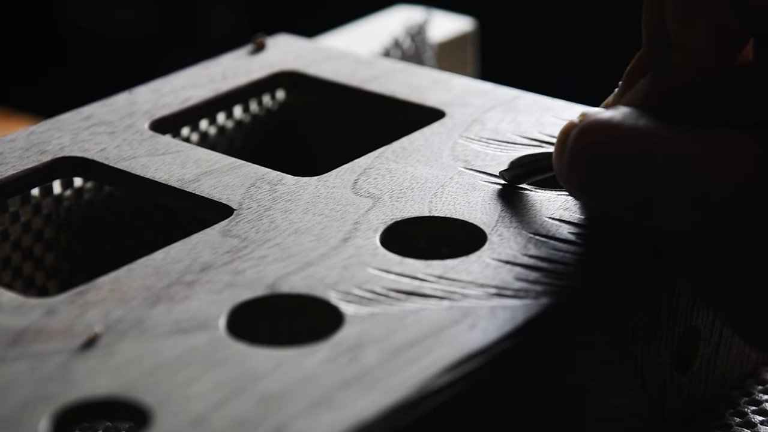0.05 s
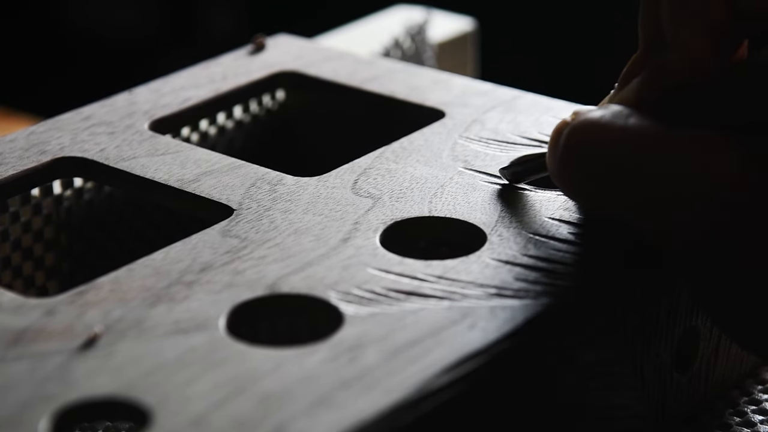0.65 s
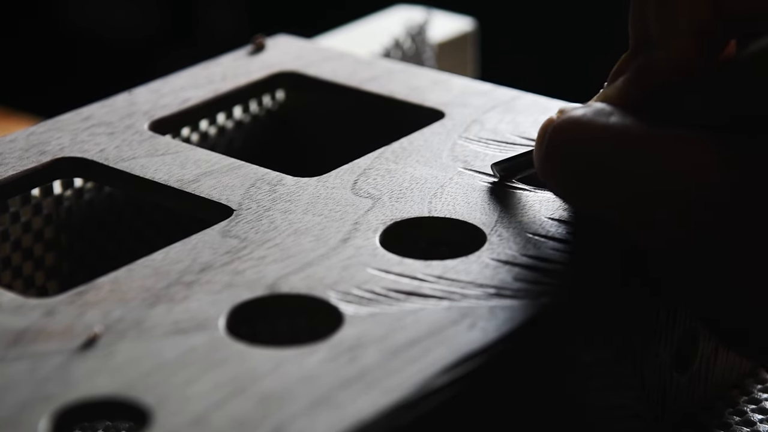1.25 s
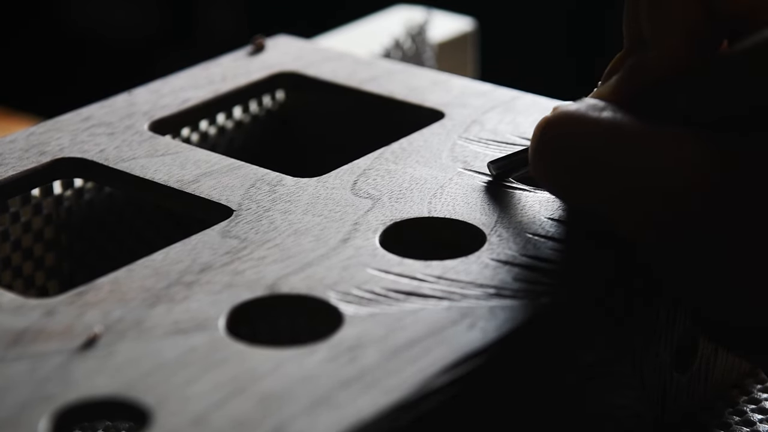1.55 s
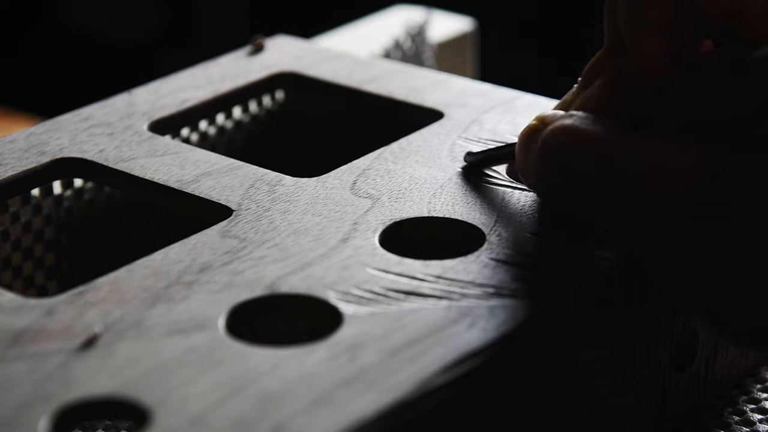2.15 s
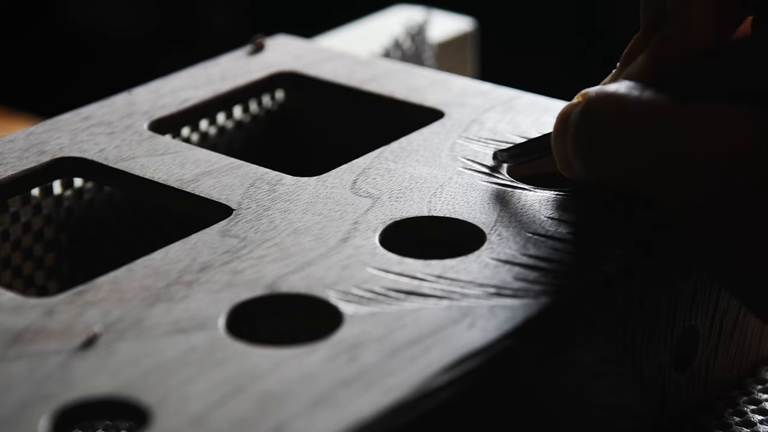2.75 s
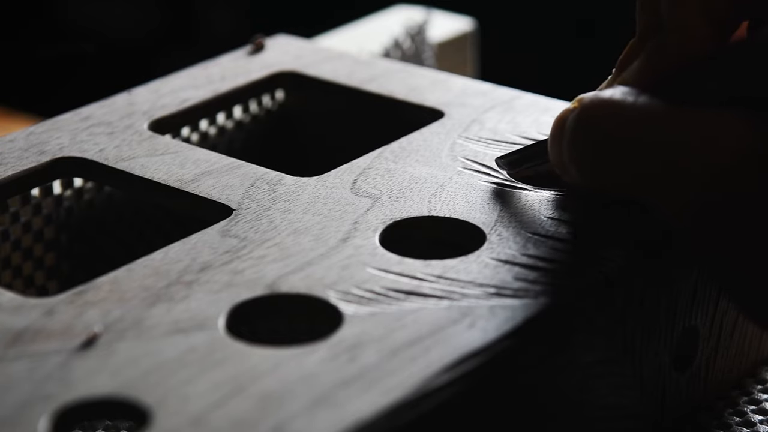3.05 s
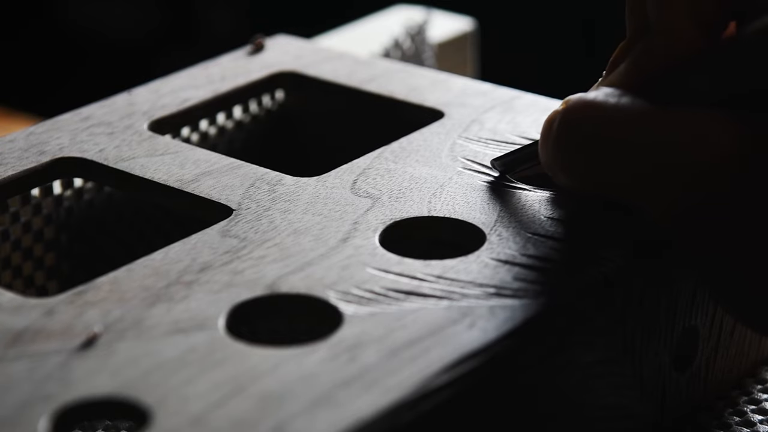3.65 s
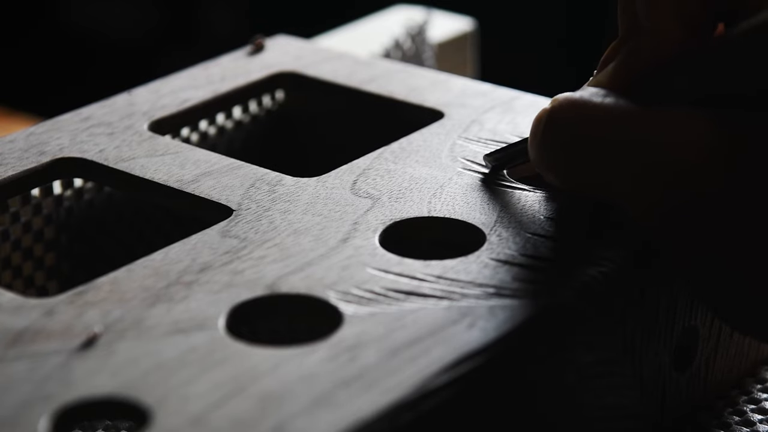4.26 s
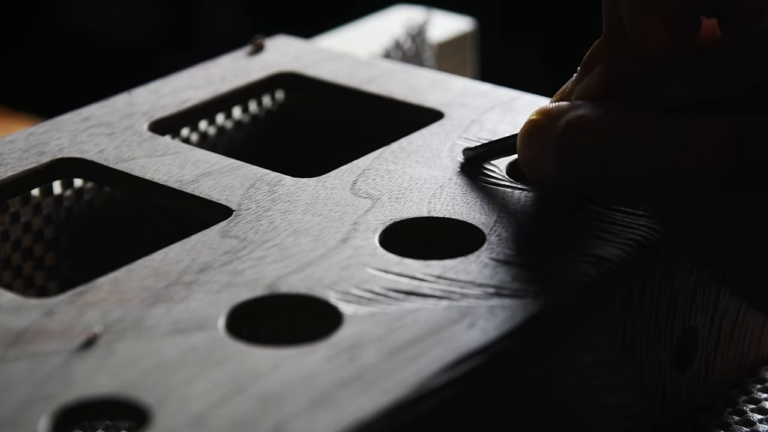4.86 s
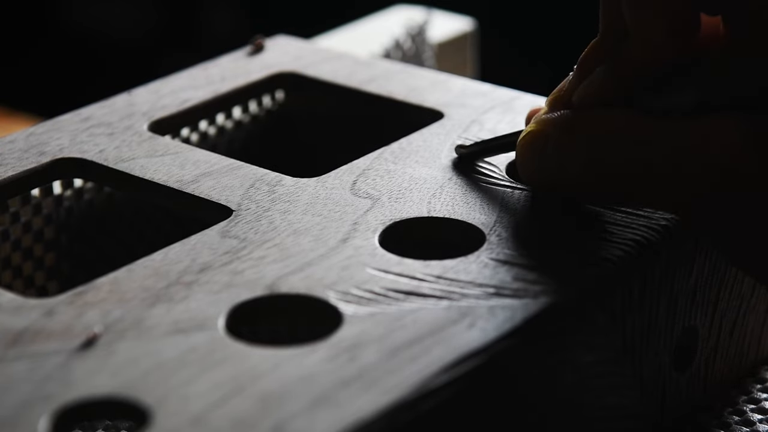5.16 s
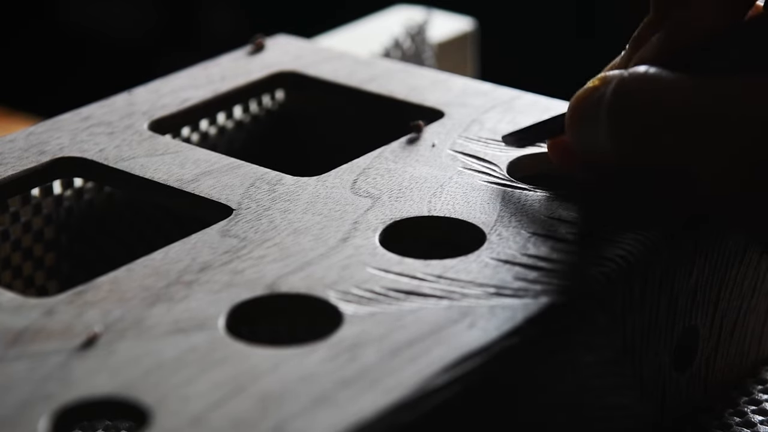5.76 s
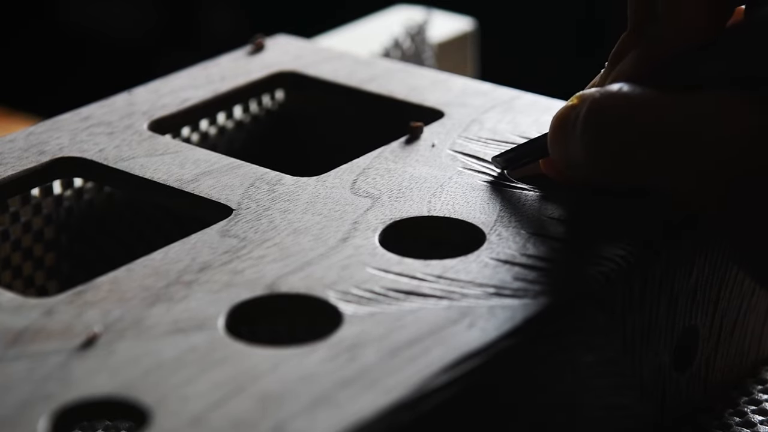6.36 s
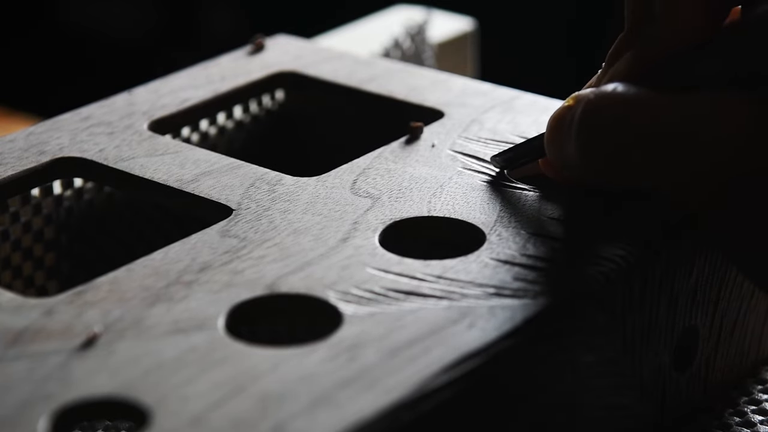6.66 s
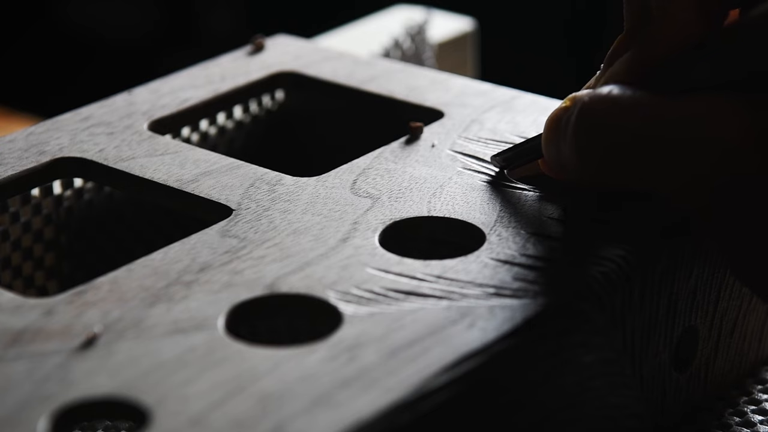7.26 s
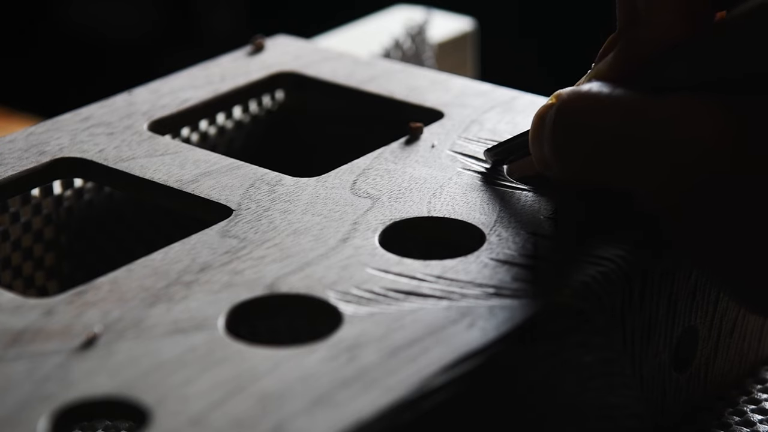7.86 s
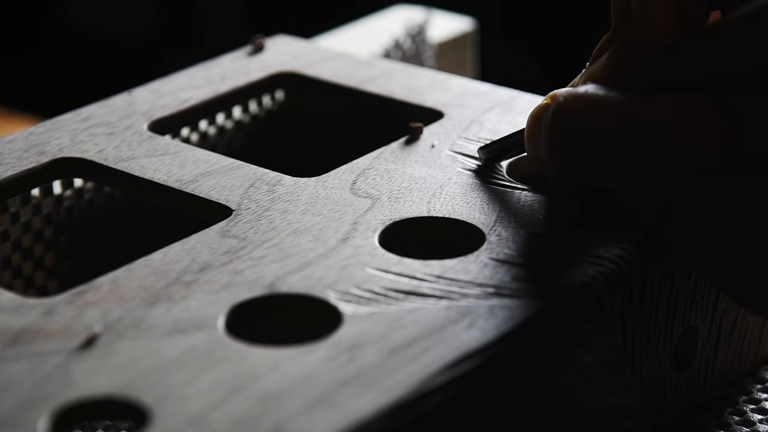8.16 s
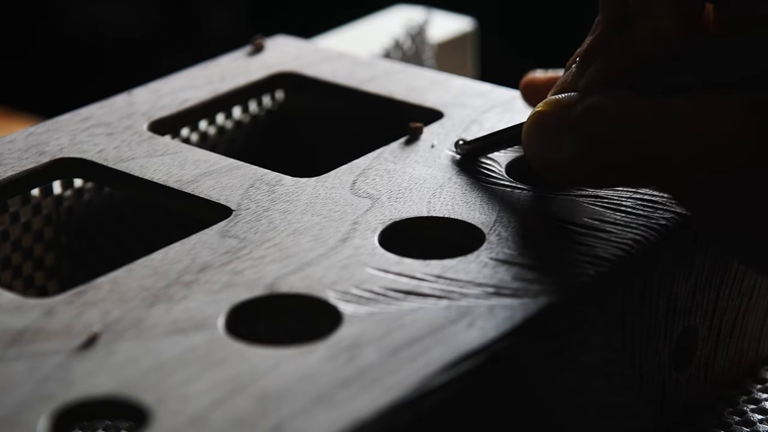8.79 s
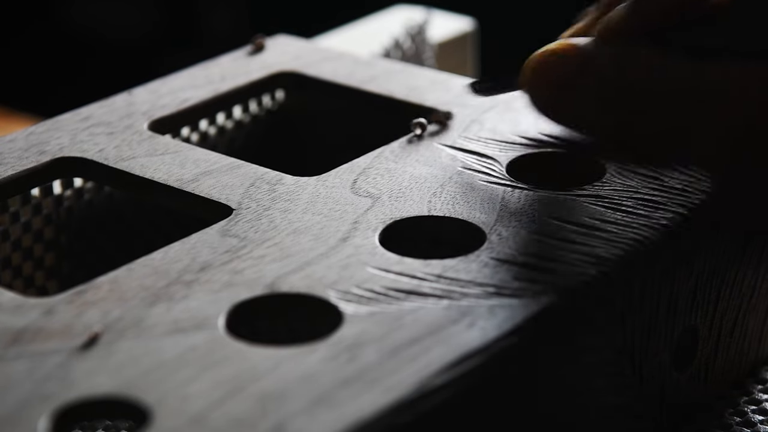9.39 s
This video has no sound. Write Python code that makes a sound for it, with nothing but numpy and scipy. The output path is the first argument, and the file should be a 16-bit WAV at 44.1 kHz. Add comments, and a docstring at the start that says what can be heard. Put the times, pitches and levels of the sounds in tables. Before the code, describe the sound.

Close to a hardwood board, a hand gouge creeps, sticks and jerks forward, making small woody scratches and crackles. The cut builds to a quick, crisp tear as the chip comes away, followed by a pause with soft, hollow bumps of the hand. This happens three times, each ending a little louder. The room is quiet, with a brief ring and a faint background hum and hiss.

```python
"""A quiet room, close to a hardwood board through which a small gouge is pushed in three slow strokes.
The edge moves by stick-slip friction: it creeps, sticks and jerks forward, and each slip fractures fibres
that excite the modes of board and blade. The slips come harder and closer together until one last tear
frees the chip. The hand resettles with soft bumps; the room rings briefly over a faint hum and hiss."""
import sys
import numpy as np
from scipy import signal
from scipy.fft import rfft, irfft, next_fast_len
from scipy.io import wavfile
from scipy.ndimage import uniform_filter1d

SR = 44100
rng = np.random.default_rng(int(sys.argv[2]) if len(sys.argv) > 2 else 0)


def unload_audio(sound):
    """Save the sound as a 16-bit wav file, at the path given as the first command line argument."""
    columns = np.transpose(np.atleast_2d(sound))
    # keep every value between -1 and 1, then stretch to whole-number steps
    steps = np.round(np.clip(columns, -1, 1) * 32767)
    wavfile.write(sys.argv[1], SR, steps.astype(np.int16))


N = 424683
RING = 4096  # samples in a resonator's impulse response
FREQS = np.arange(RING // 2 + 1) * SR / RING
LEAD_S, SLIP_SAMPLES = 0.02, 5292  # lead-in and total span of one slip

# strokes: bite t/s, first creep level/dB, last creep level/dB, exponent of the build-up, judder/dB
STROKE_PLAN = [(0.57, -68.5, -46, 4.2, 2.3), (3.5, -71.5, -59.5, 1.1, 3.4), (6.98, -69.5, -67, 1.7, 3.8)]
# the tear that ends each stroke: t/s, duration/s, level/dB, treble/dB
FINAL_TEARS = [(2.21, 0.11, -41.5, 2.5), (5.263, 0.061, -35.5, 0.5), (9.093, 0.087, -30.5, 1.5)]


def undb(db):
    """Amplitude ratio of a level in decibels."""
    return 10 ** (np.asarray(db) / 20)


def level(x, db):
    """Scale a signal to an rms level."""
    return x * undb(db) / np.sqrt(np.mean(x ** 2))


def peak(x, db):
    """Scale a signal to a peak level."""
    return x * undb(db) / np.abs(x).max()


def add(out, start, x):
    """Superpose a sound from a start time in seconds."""
    i = int(start * SR)
    out[i:i + len(x)] += x[:len(out) - i]


def walk(rate):
    """Low-pass random modulation with a spread near 1."""
    hold = int(SR / rate)
    steps = np.repeat(rng.standard_normal(N // hold + 1), hold)
    return 1.337 * uniform_filter1d(uniform_filter1d(steps, hold), hold)[:N]


def resonance(hz, width):
    """Power response of one steep-sided mode: a cubed Lorentzian."""
    return (1 + ((FREQS - hz) / width) ** 2) ** -3


def ring(power):
    """Minimum-phase impulse response of a power spectrum, spread in time by dispersion in the wood."""
    cepstrum = irfft(np.log(power + 1e-9) / 2)
    cepstrum[1:RING // 2] *= 2
    cepstrum[RING // 2 + 1:] = 0
    delay_s = .0002 + .0006 * np.interp(FREQS, np.linspace(0, SR / 2, 20), rng.random(20))
    response = irfft(np.exp(rfft(cepstrum) - 2j * np.pi * np.cumsum(delay_s) * SR / RING))
    return response * np.hanning(2 * RING)[RING:]


def split(x, hz=2400):
    """Crossover filter: the woody body and the treble of a sound."""
    return [signal.sosfilt(signal.butter(4, hz, kind, fs=SR, output="sos"), x)
            for kind in ("low", "high")]


def background(air_db=-68.5, sway_db=1.26, waver_db=4, drift_hz=2.33, side_db=-21):
    """Room air is coloured noise, nearly alike at both ears; a hum wavers in frequency and amplitude."""
    # spectrum of the still air: f/Hz, relative level/dB
    air_spectrum = [(40, -14.5), (58, -3.5), (90, -5.5), (125, -2.5), (270, -1.5), (500, -3.5),
                    (1000, -7.5), (2000, -18.5), (4000, -25), (7000, -35.5), (16000, -82)]
    # hum: f/Hz, level/dB
    hum_tones = [(242.2, -77)]
    hz, db = np.transpose(air_spectrum)
    size = next_fast_len(N, True)
    log_hz = np.log(np.arange(size // 2 + 1) * SR / size + 1)
    colour = undb(np.interp(log_hz, np.log(hz), db))
    noise = irfft(rfft(rng.standard_normal((2, size))) * colour, size)
    mid, side = level(noise[:, :N], air_db)
    out = mid * undb(sway_db * walk(4.14)) + undb(side_db) * np.array([side, -side])
    for hum_hz, hum_db in hum_tones:
        phase = 2 * np.pi * np.cumsum(hum_hz + drift_hz * walk(14)) / SR
        out += level(np.sin(phase) * undb(waver_db * walk(7)), hum_db)
    return out


def handling(bump_hz=254, bump_width_hz=64, bump_s=0.076):
    """Soft contacts each excite one low, damped mode as the grip shifts and the board rocks."""
    # dull knocks of hand, tool and board: t/s, peak level/dB, f/Hz, width/Hz, duration/s
    knocks = [(2.155, -58, 110, 45, 0.187), (5.237, -48, 94, 60, 0.14)]
    # hollow bumps as the hand resettles: t/s, peak level/dB
    bumps = [(0.09, -60.5), (2.485, -59), (3.02, -58.5), (5.81, -58), (6.71, -59)]
    contacts = knocks + [(start, db, bump_hz, bump_width_hz, bump_s) for start, db in bumps]
    out = np.zeros(N)
    for start, db, hz, width, length in contacts:
        n = int(length * SR)
        force = rng.standard_normal(n) * np.hanning(n)
        add(out, start, peak(signal.fftconvolve(force, ring(resonance(hz, width))), db))
    return out


def fibres(n, rate, spread_db=3.0, rub_db=-11.5):
    """Acoustic emission: tiny fractures form a random impulse train over the friction of the bevel."""
    size = undb(spread_db * np.minimum(rng.exponential(size=n), 4)) * rng.choice([-1, 1], n)
    clicks = size * (rng.random(n) < rate / SR)
    return clicks + undb(rub_db) * rng.standard_normal(n)


def board(scatter_db, force_db, damping_per_db=0.15, detune=0.019):
    """Modal power response of board and blade; place and depth of the cut shift and weight the modes."""
    # modes of board and blade: f/Hz, width/Hz, relative level/dB
    modes = [(104, 57, -22), (305, 88, -20.5), (470, 50, -12.5), (593, 87, -6.5), (700.3, 78, 3.5),
             (880, 109, -1), (1100, 99, -1.5), (1264.5, 63, -2.5), (1413, 63, -9.5), (1593, 187, -5.5),
             (1803, 79, -7), (2093, 440, -19), (2918, 216, -11), (3250, 85, -18.5), (3630, 213, -14),
             (4098, 374, -15), (4710, 130, -16.5), (5242, 220, -12), (5710, 125, -16), (6515, 320, -11),
             (7440, 520, -12.5), (8060, 270, -12.5), (8420, 270, -20.5), (9100, 300, -20.5),
             (9790, 380, -19.5), (10410, 460, -22.5), (12150, 600, -24), (14000, 5600, -35.5)]
    # growth of the modes with the depth of cut: f/Hz, slope/(dB per dB of force)
    depth_slopes = [(90, 0.4), (700, 0.27), (1100, 0.05), (1800, 0.455), (2900, 0.2057), (12000, 0.5)]
    hz, width, db = np.transpose(modes)
    width = width * undb(damping_per_db * force_db * (hz > 2400))  # pressing damps the blade
    hz = hz * (1 + detune * rng.uniform(-1.07, 1, len(hz)))
    slope_hz, slope = np.transpose(depth_slopes)
    db = db + force_db * np.interp(np.log(hz), np.log(slope_hz), slope)
    db = db + scatter_db * rng.uniform(-1.18, 1, len(hz))
    return sum(gain ** 2 * resonance(f, w) for gain, f, w in zip(undb(db), hz, width))


def creep(treble_db=-3, flutter_db=4.0, bite_s=0.053):
    """Microfracture under a rising load: a fine crackle grows as the hand leans in, until the chip parts."""
    grain = fibres(N, rate=1200) * undb(flutter_db * walk(70))
    light_touch = ring(board(scatter_db=0, force_db=-22))
    body, treble = split(signal.fftconvolve(grain, light_touch)[:N])
    crackle = body + undb(treble_db) * treble
    t, push = np.arange(N) / SR, 0
    for (bite, first_db, last_db, exponent, _), (tear_s, length, _, _) in zip(STROKE_PLAN, FINAL_TEARS):
        effort = np.clip((t - bite) / (tear_s - bite), 0, 1) ** exponent
        contact = np.clip((t - bite) / bite_s, 0, 1) * (t < tear_s + length)
        push = push + contact * undb(first_db + (last_db - first_db) * effort)
    return push * level(crackle, 0)


def linger(x):
    """Free vibration: lightly damped modes of the work decay exponentially after each excitation."""
    # lightly damped modes: f/Hz, T60/s, gain at resonance/dB
    lasting_modes = [(88.3, 0.55, 0.5), (1310, 0.4, -3), (3540, 0.46, 3), (3780, 0.32, 1.5)]
    t, response = np.arange(SR) / SR, 0
    for hz, t60, db in lasting_modes:
        decay = np.log(1000) / t60
        response = response + undb(db) * 2 * decay / SR * np.exp(-decay * t) * np.cos(2 * np.pi * hz * t)
    return signal.fftconvolve(x, response)[:N]


def room(x, build_s=0.01):
    """Reverberation: diffuse reflections build up quickly, then each band decays at its own rate."""
    # reverberation bands: f/Hz, T60/s, gain/dB
    bands = [(90, 0.34, 1), (272, 0.41, 1), (684, 0.34, -16), (1360, 0.51, -15), (1860, 0.4, -11),
             (4060, 0.45, -11), (7500, 0.42, -24), (13100, 0.3, -11)]
    t = np.arange(SR) / SR
    noise = rfft(rng.standard_normal(SR))
    log_hz, log_centres = np.log(np.arange(SR // 2 + 1) + 1), np.log(np.array(bands)[:, 0])
    tail = 0
    for share, (_, t60, db) in zip(np.eye(len(bands)), bands):
        band = irfft(noise * np.interp(log_hz, log_centres, share))
        fade = np.exp(-np.log(1000) * t / t60) * (1 - np.exp(-(t / build_s) ** 2))
        tail = tail + undb(db) * band * fade / np.linalg.norm(fade)
    return signal.fftconvolve(x, tail)[:N]


def judder_at(time):
    """Depth in dB of the amplitude modulation by the uneven run of the edge in the current stroke."""
    stroke = sum(time > row[0] for row in STROKE_PLAN[1:])
    return STROKE_PLAN[stroke][-1]


def slip(length, db, treble_db, judder_db, arch_db=3, stop=0.32, skirt_db=-19,
         rise_s=0.00018, fall_s=0.0018, skirt_s=0.017, judder_hz=140):
    """One stick-slip cycle: fibres give, tear in a juddering run, and the edge sticks with a thud."""
    length = np.clip(length, .003, .08)
    t = np.arange(SLIP_SAMPLES) / SR - LEAD_S
    beats = np.cumsum(rng.uniform(0.59, 1.472, size=64)) / judder_hz - LEAD_S
    swings = (-1) ** np.arange(len(beats)) * rng.uniform(0, 2.1, len(beats))
    judder = undb(judder_db * np.interp(t, beats, swings))
    onset = (1 + np.tanh((t - rise_s) / (rise_s + 0.096 * length) / 2)) / 2
    release = (1 - np.tanh((t - length) / fall_s / 2)) / 2
    arch = undb(-arch_db * np.minimum((2 * t / length - 1) ** 2, 1))  # positive: fastest halfway
    # a little tearing before and after the run
    skirt = undb(skirt_db) * np.exp(-np.maximum(np.abs(t - length / 2) - length / 2, 0) / skirt_s)
    envelope = onset * release * arch + skirt
    force_db = db + 32.0
    fracture_rate = 5000 * undb(0.5 * force_db)  # a light cut breaks few fibres
    force = envelope * judder * fibres(SLIP_SAMPLES, fracture_rate, rub_db=-12)
    thud = np.exp(-((t - length) / 0.00026) ** 2)
    force = force + stop * np.linalg.norm(force) / np.sqrt(length * SR) * thud
    body, treble = split(signal.fftconvolve(force, ring(board(scatter_db=3.5, force_db=force_db))))
    tilt = undb(treble_db - 9.0)
    wood = body / np.linalg.norm(body) + tilt * treble / np.linalg.norm(treble)
    shaving = undb(-19.5 + 0.3 * force_db) * splinters(envelope)
    return (wood + shaving) * undb(db) * np.sqrt(length * SR / (1 + tilt ** 2))


def splinters(envelope, rate=1100, low_hz=7000, high_hz=15500, width_hz=260, count=9):
    """Brittle fracture of the shaving: random impulses excite a few high modes of each piece."""
    clicks = (rng.random(len(envelope)) < rate / SR) * rng.standard_normal(len(envelope))
    power = sum(resonance(hz, width_hz) / hz ** 2 for hz in rng.uniform(low_hz, high_hz, count))
    sound = signal.fftconvolve(clicks * envelope, ring(power / power.max()))
    return sound / (np.linalg.norm(sound) + 1e-12)


def snap(db, splinter_s=0.0014, splinter=0.8, treble_db=3.5):
    """Impulse excitation: a fibre bundle breaks at once, with a brief trail of splinters."""
    t = np.arange(SR // 100) / SR
    force = splinter * rng.standard_normal(len(t)) * np.exp(-t / splinter_s)
    force[0] += 1
    power = board(scatter_db=2, force_db=2.5) * undb(treble_db * FREQS / 8000) ** 2
    return peak(signal.fftconvolve(force, ring(power)), db)


def rasp(length, db, flutter_db=5.5, places=8):
    """Moving excitation point: fibres tear without a break, and each place weights the modes anew."""
    n = int(length * SR)
    grain = fibres(n, rate=2500) * undb(flutter_db * walk(69.6)[:n]) * signal.windows.tukey(n, .5)
    travel, sound = np.linspace(0, places - 1, n), 0
    for place in range(places):
        nearness = np.sqrt(np.maximum(1 - np.abs(travel - place), 0))
        sound = sound + signal.fftconvolve(grain * nearness, ring(board(scatter_db=4, force_db=-19)))
    return level(sound[:n], db)


def tear(start, length, db, treble_db, spacing_s=0.012, moving_share=0.9):
    """Rapid stick-slip: slip follows slip with hardly a pause as the chip breaks away."""
    out = np.zeros(N)
    count = round(length / spacing_s)
    step = length / count
    slip_db = db - 10 * np.log10(moving_share)
    for k in range(count):
        onset = start + step * (k + (k > 0) * rng.uniform(-.15, .15))
        jerk = slip(step * moving_share, slip_db, treble_db, judder_at(start),
                    arch_db=-0.5, stop=0.17, skirt_db=-20.0)
        add(out, onset - LEAD_S, jerk)
    return out


def carving(snap_db=-3):
    """Superposition of the creep, slips, rasps, snaps and final tear of every stroke."""
    # separate slips of the edge: t/s, duration/s, level/dB, treble/dB
    slips = [ (0.861, 0.031, -59.5, -3), (0.95, 0.073, -61.5, 1.5), (1.059, 0.048, -61.5, 1.5),
             (1.176, 0.027, -64.5, 10), (1.396, 0.02, -56.5, 3), (1.641, 0.026, -48, 2),
             (1.716, 0.044, -57, 11), (1.768, 0.039, -60, 6), (1.855, 0.037, -52.5, 1.5),
             (1.928, 0.04, -45.5, 3.5), (1.992, 0.027, -41.5, 4.5), (2.058, 0.067, -40.5, 3),
             (2.154, 0.038, -41.5, 0), (3.578, 0.042, -67, 4), (3.736, 0.043, -58.5, -0.5),
             (3.899, 0.05, -55.5, 0), (4.047, 0.049, -60, 2), (4.102, 0.032, -54, 4),
             (4.252, 0.033, -45, 0.5), (4.311, 0.028, -50.5, 2), (4.358, 0.038, -47, 0),
             (4.435, 0.029, -50.5, 3.5), (4.512, 0.014, -42, 1.5), (4.566, 0.0038, -47, -5),
             (4.584, 0.044, -43, 1), (4.649, 0.026, -40.5, 5), (4.707, 0.016, -39.5, 4),
             (4.733, 0.0094, -43, 4.5), (4.761, 0.0086, -39, 10), (4.775, 0.005, -40.5, 1),
             (4.815, 0.0055, -41, -1), (4.825, 0.0087, -35, 3), (4.85, 0.007, -41, 5),
             (4.892, 0.016, -42, 5), (4.916, 0.018, -52, 3), (5, 0.007, -41.5, -3), (5.08, 0.008, -37, 3.5),
             (5.12, 0.0068, -33.5, -1.5), (5.186, 0.016, -36, 1.5), (5.203, 0.016, -37.5, 4),
             (5.226, 0.0076, -34, 2), (5.238, 0.0048, -36, 9), (5.25, 0.0079, -34.5, 2.5),
             (7.112, 0.017, -62, 3), (7.228, 0.018, -56, 0.5), (7.355, 0.035, -58, 0),
             (7.422, 0.06, -58, 1.5), (7.519, 0.014, -60, 8), (7.621, 0.023, -51.5, 1.5),
             (7.676, 0.026, -49.5, 2.5), (7.788, 0.058, -55, 3), (7.922, 0.043, -53.5, 5),
             (8.017, 0.037, -48.5, 2.5), (8.123, 0.034, -52, 0.5), (8.205, 0.019, -48, 9.5),
             (8.23, 0.044, -46, 1.5), (8.353, 0.038, -39, 1), (8.393, 0.035, -44, 1.5),
             (8.426, 0.0078, -39.5, 0), (8.493, 0.0094, -38, 1.5), (8.545, 0.0085, -37.5, 2),
             (8.557, 0.0083, -39.5, 3.5), (8.642, 0.012, -33.5, 1.5), (8.685, 0.0089, -37, 1),
             (8.773, 0.0093, -32.5, 3), (8.873, 0.0065, -34, 1.5), (8.923, 0.013, -44.5, 2.5),
             (8.947, 0.0048, -31.5, -5), (8.956, 0.01, -34, 2.5), (8.977, 0.0026, -39.5, 6),
             (9.002, 0.0062, -28, 2), (9.033, 0.003, -35.5, 5), (9.04, 0.0068, -31, -0.5),
             (9.051, 0.0042, -29.5, 2), (9.059, 0.0067, -33.5, 0), (9.076, 0.0084, -30.5, 0.5)]
    # rasping between slips: t/s, duration/s, level/dB
    rasps = [(1.892, 0.35, -54.5), (4.201, 0.72, -53.5), (8.299, .6, -65.5)]
    # fibre bundles that break: t/s, peak level/dB before snap_db is added
    snaps = [(1.398, -38), (2.097, -32), (2.136, -23.5), (4.103, -33), (4.258, -39), (4.316, -38),
             (4.567, -36), (5.287, -26), (7.830, -32.5), (8.213, -30), (8.353, -25.5), (8.642, -16.5),
             (8.950, -21), (9.097, -18), (9.144, -17.5)]
    out = creep()
    for start, length, db, treble_db in slips:
        add(out, start - LEAD_S, slip(length, db, treble_db, judder_at(start)))
    for start, length, db in rasps:
        add(out, start, rasp(length, db))
    for start, db in snaps:
        add(out, start, snap(db + snap_db))
    return out + sum(tear(*row) for row in FINAL_TEARS)


def touch(start_s=3.23, peak_db=-49.5, decay_s=0.002):
    """Light impact: the edge is set down, and a short force pulse rings the wood with a tick."""
    # modes of the tick: f/Hz, width/Hz, relative level/dB
    tick_modes = [(1170, 150, -2), (1640, 120, -1)]
    n = int(decay_s * SR)
    force = np.exp(-np.arange(4 * n) / n)
    power = sum(undb(db) ** 2 * resonance(hz, width) for hz, width, db in tick_modes)
    out = np.zeros(N)
    add(out, start_s, peak(signal.fftconvolve(force, ring(power)), peak_db))
    return out


def scene(haze_db=-13, hiss_db=-77.5):
    """Mid-side stereo: a faint, wide treble haze follows the cuts; air and hiss differ left and right."""
    work = carving() + touch()
    haze = undb(haze_db) * split(room(work), hz=5250)[1]
    mid = work + linger(work) + room(work) + handling()
    return mid + np.array([haze, -haze]) + background() + undb(hiss_db) * rng.standard_normal((2, N))


def record(dry):
    """Band limiting: a steep elliptic low-pass cuts the top of the spectrum."""
    return signal.sosfilt(signal.ellip(10, .1, 70, 15750, fs=SR, output="sos"), dry)


dry = scene()
out = record(dry)
unload_audio(out)
```